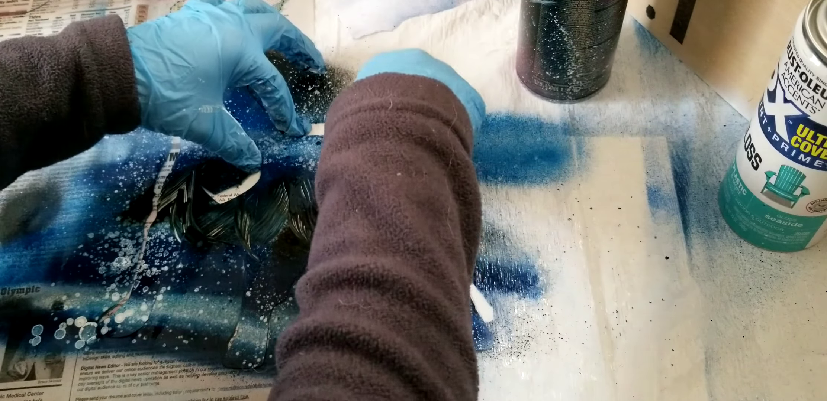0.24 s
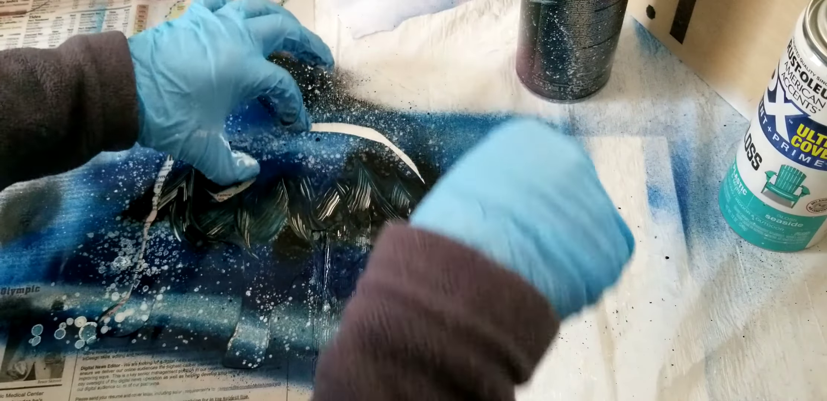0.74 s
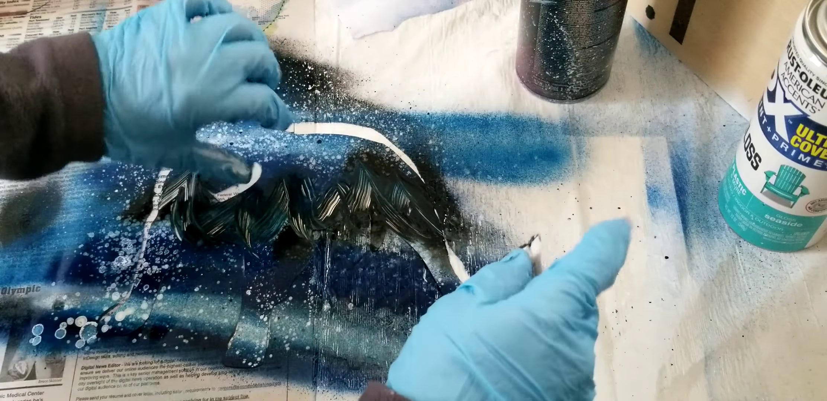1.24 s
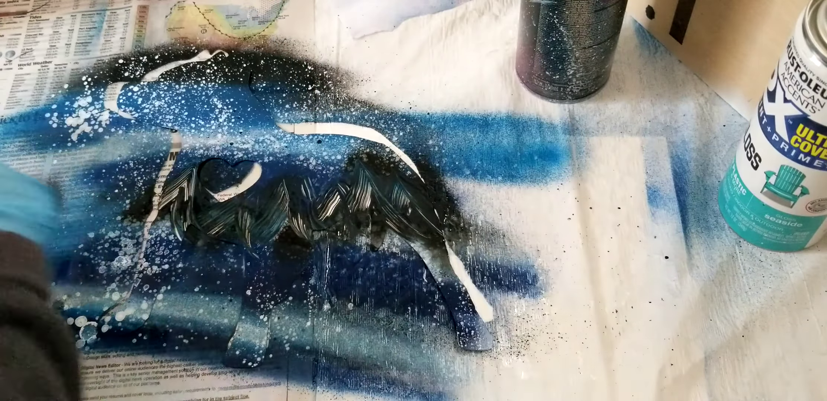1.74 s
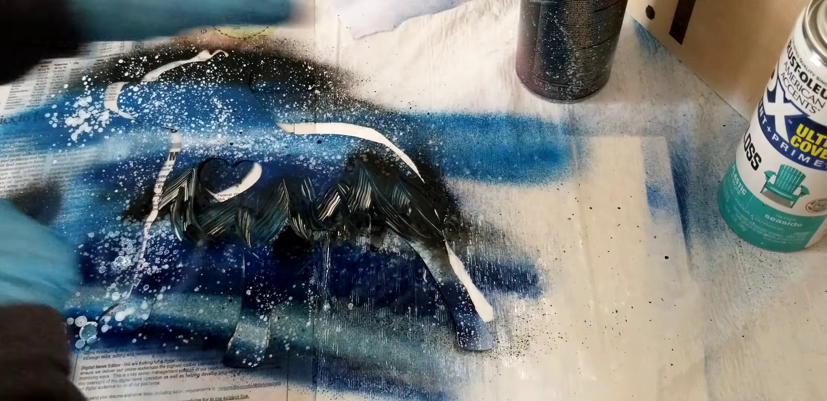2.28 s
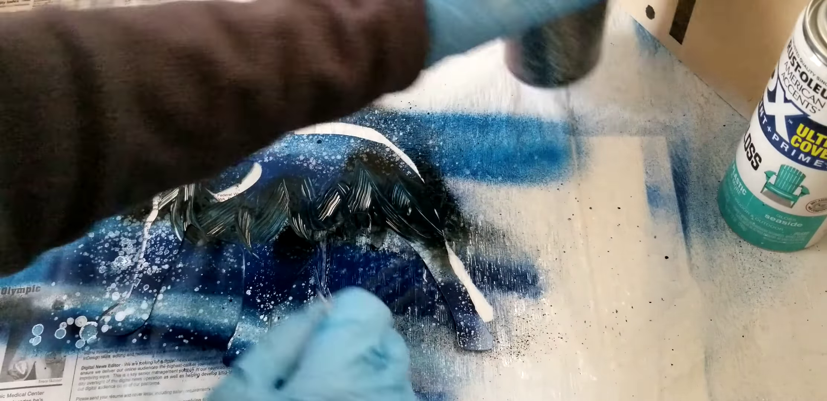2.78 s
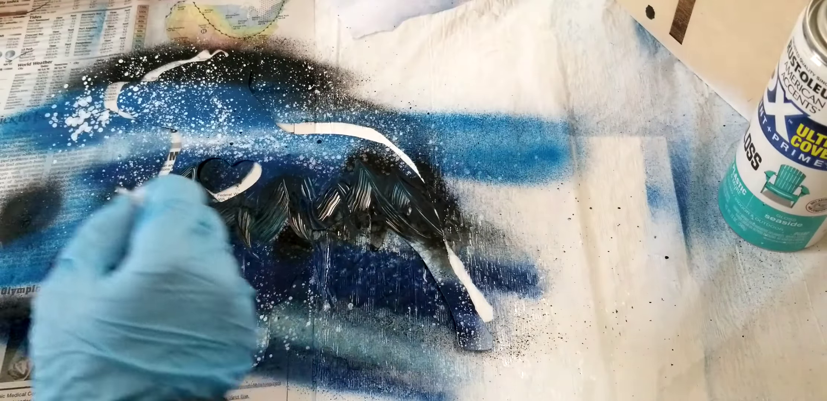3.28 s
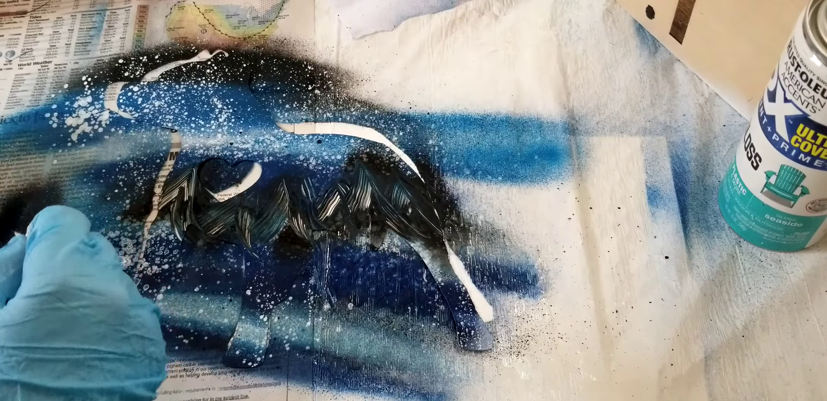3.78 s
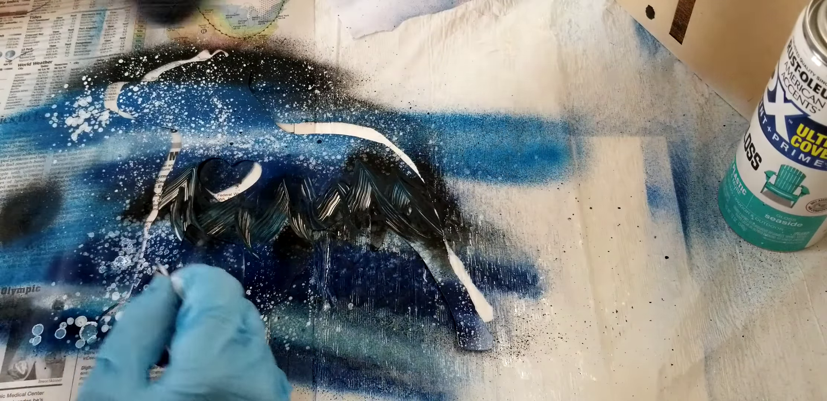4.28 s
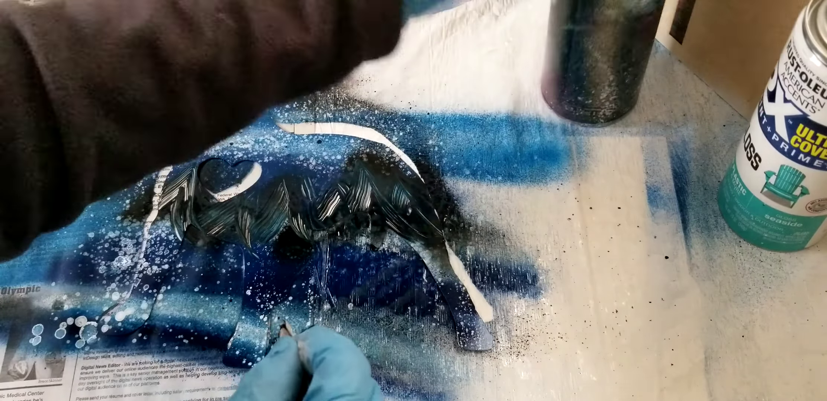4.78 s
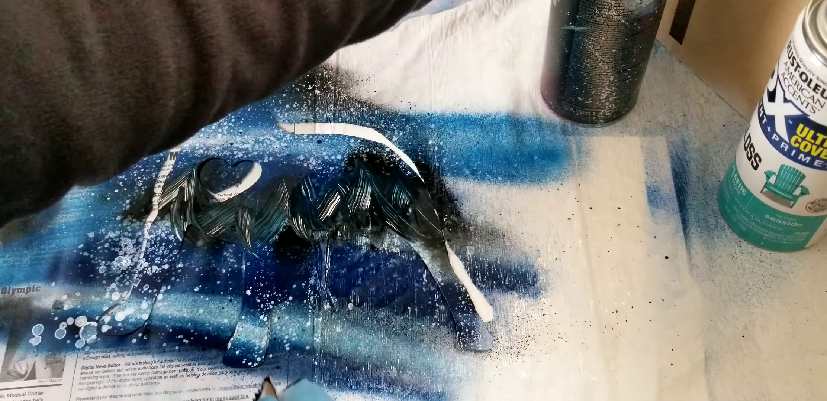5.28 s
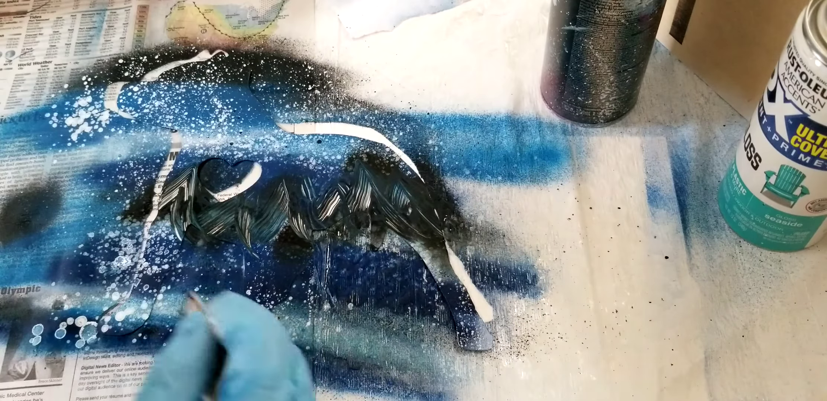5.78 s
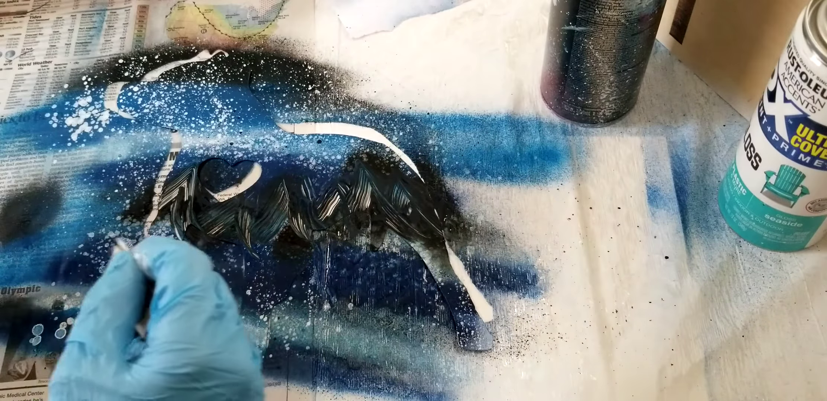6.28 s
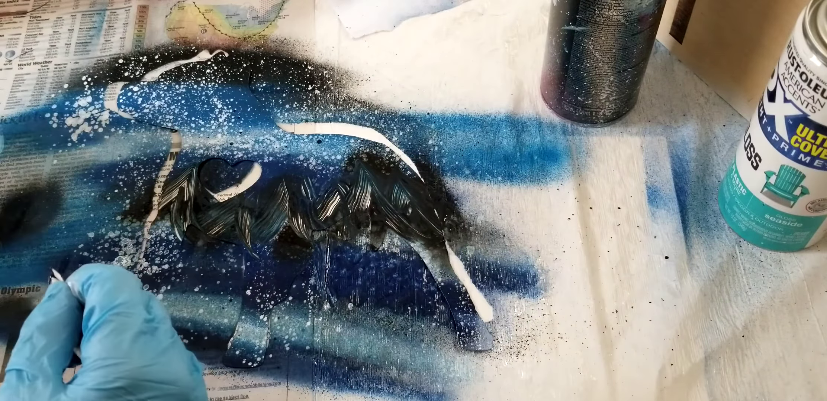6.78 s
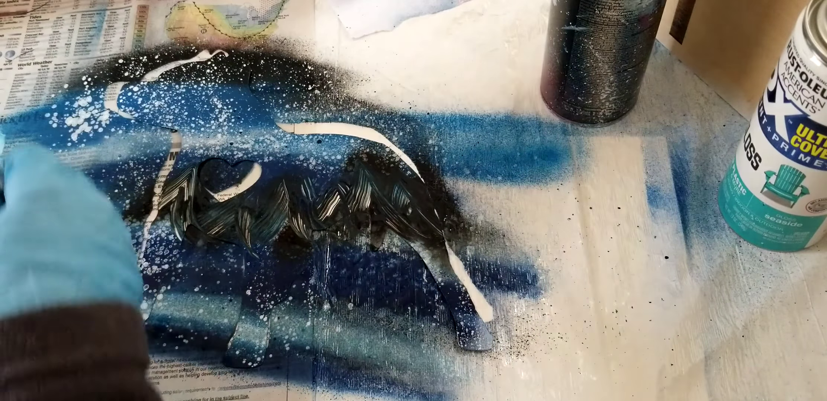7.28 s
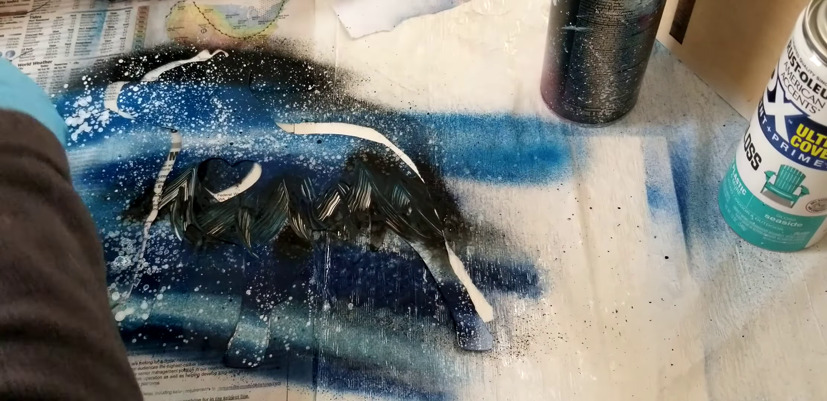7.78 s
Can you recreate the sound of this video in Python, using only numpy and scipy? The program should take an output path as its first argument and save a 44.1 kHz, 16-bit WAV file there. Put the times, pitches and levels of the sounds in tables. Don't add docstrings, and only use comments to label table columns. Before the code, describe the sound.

A small, fairly dry room with a faint mains motor hum and soft hiss; a close stereo pair hears the work mostly left. Light paper rustles and tiny flecks begin, with crackles at 0.7-0.8 s and sharp ticks at 1.0 and 1.2. Soft low bumps come at 2.0-2.1, a crisp tick at 2.7. From 3.1 to 3.45 stiff paper snaps and crumples loudly, with a brief rubbery squeak at 3.1-3.2. Two hissing rips follow at 3.5 and 3.75, then small snaps around 4. At 4.58 a can lands hard: bright crack, deep table boom, then little rocking bumps until 5.05. Crackles at 5.4 and 5.9 sit among faint rustles and barely audible whistles. Two more quick rips come at 6.7 and 6.9, then snapping, rustling and a thin whistle around 7.1-7.25. A heavy, dull double knock at 7.72-7.76 ends in light paper ticks.

```python
import sys
import numpy as np
from scipy import signal
from scipy.fft import rfft, irfft, next_fast_len
from scipy.io import wavfile
from scipy.ndimage import uniform_filter1d

SR = 44100
rng = np.random.default_rng(int(sys.argv[2]) if len(sys.argv) > 2 else 0)


def voltage_ratio(level):
    return 10 ** (np.asarray(level, float) / 20)


def waveform_to_disk(signal):
    frames = np.transpose(np.atleast_2d(signal))
    scaled = np.clip(frames, -1, 1) * 32767
    samples = np.round(scaled).astype(np.int16)
    wavfile.write(sys.argv[1], SR, samples)


N = 354563
TIME = np.arange(N) / SR
STEP = 32
LEFT_LEAD = 11
TOP_HZ = 15800
ALIKE_BASS = .95


def in_time(rows):
    s, *columns = np.transpose(rows)
    return [np.interp(TIME, s, c) for c in columns]


def rms_one(x):
    return x / np.sqrt(np.mean(x ** 2) + 1e-20)


def drift(rate):
    r = np.exp(-2 * np.pi * rate * 20 / SR)
    steps = rng.standard_normal(N // 20 + 3002)
    slow = signal.lfilter([1], [1, -2 * r, r * r], steps)[3000:]
    return np.interp(np.arange(N) / 20, np.arange(len(slow)), rms_one(slow - slow.mean()))


def noise(spectrum, alike, lead=LEFT_LEAD):
    size = next_fast_len(N + 64)
    hz = np.maximum(np.arange(size // 2 + 1) * SR / size, 1)
    points = np.array(spectrum)
    shared, left, right = rng.standard_normal((3, size))
    alike = np.clip(alike, 0, 1)
    common = np.sqrt(alike) * np.array([shared, np.roll(shared, lead)])
    own = np.sqrt(1 - alike) * np.array([left, right])
    colour = voltage_ratio(np.interp(np.log(hz), np.log(points[:, 0]), points[:, 1])) * (hz < TOP_HZ)
    return rms_one(irfft(rfft(common + own) * colour, size)[:, :N])


def sides(pan_db):
    return np.array([voltage_ratio(pan_db / 2), voltage_ratio(-pan_db / 2)])


def placed(x, pan_db):
    return np.array([x, np.roll(x, LEFT_LEAD)]) * sides(pan_db)[:, None]


def ring(clicks, hz, t60):
    r, w = voltage_ratio(-60 / (t60 * SR)), 2 * np.pi * hz / SR
    return signal.lfilter([0, np.sin(w)], [1, -2 * r * np.cos(w), r * r], clicks + 1e-18)


def fade(clicks, t60):
    return signal.lfilter([1], [1, -voltage_ratio(-60 / (t60 * SR))], clicks + 1e-18)


def grain(per_s, spread_db, t60, smooth):
    sizes = voltage_ratio(spread_db * np.minimum(rng.exponential(1, N), 4))
    born = rng.random(N) < per_s / SR
    return rms_one(smooth + rms_one(fade(sizes * born, t60)))


def no_bass(x, hz):
    return signal.sosfilt(signal.butter(4, hz, "high", fs=SR, output="sos"), x)


def dull(x, hz):
    return signal.sosfilt(signal.butter(2, min(hz, 18000), fs=SR, output="sos"), x)


def swell_power(s, db, held_s, rise, fall):
    t = TIME[::STEP]
    below_db = rise * np.maximum(s - t, 0) + fall * np.maximum(t - s - abs(held_s), 0)
    return voltage_ratio(2 * (db - np.minimum(below_db, 150)))


# time_s, hum_db
BACKGROUND_GAIN = [(0.0, -56.5), (2.53, -50), (3.09, -56.5), (4.45, -62), (4.6, -63.5), (8.04, -54.5)]
# pitch_hz, level_db
MOTOR_LINES = [(59.5, -3), (119.5, -12), (238.5, -27), (358.5, -18.5), (477, -25)]
# frequency_hz, density_db_per_hz
RUMBLE = [(12, -37.5), (20, -49), (39, -9), (59, 9), (86, -9.5), (124, -14.5), (323, -22.5), (360, -22.5),
          (409, -21), (472, -24.5), (1500, -52), (1950, -75.5), (3300, -120)]
# frequency_hz, density_db_per_hz
HISS = [(410, -30), (700, -20.5), (920, -8.5), (1010, -13.5), (4560, -21), (5540, -9.5), (8630, -24.5),
        (12700, -8.5), (15700, -5.5)]


def background():
    hum_db, = in_time(BACKGROUND_GAIN)
    lines = 0
    for hz, db in MOTOR_LINES:
        lines = lines + voltage_ratio(db + 2.5 * drift(1.4)) * np.sin(2 * np.pi * hz * TIME + 1.1 * drift(3.3))
    rumble = voltage_ratio(-6.5) * noise(RUMBLE, alike=ALIKE_BASS, lead=0) * voltage_ratio(0.5 * drift(6.2))
    hiss = voltage_ratio(-14.0) * noise(HISS, alike=0.079)
    return voltage_ratio(hum_db) * (voltage_ratio(-2.0) * lines * sides(3.0)[:, None] + rumble + hiss)


# frequency_hz, density_db_per_hz
PAPER = [(1180, -14), (2000, -12), (2140, -6.5), (2280, -10.5), (2730, -5), (3380, -7), (4350, -3),
         (4860, -4), (7040, 0.5), (8080, -11.5), (10700, -4.5), (15700, 1)]
# start_s, level_db, held_s
STROKES = [(.3, -69, 0.097), (.55, -73, 3.75), (.6, -62.5, 0.019), (.73, -61, 0.018),
           (0.799, -44.5, 0.0058), (1.0, -53.5, 0.054), (1.3, -61, 0.07), (1.54, -59.5, 0.0045),
           (2.12, -68.5, 0.28), (2.53, -63.5, 0.094), (2.74, -53.5, 0.013), (2.911, -49.5, 0.0067),
           (3.04, -51, 0.4), (3.298, -37, 0.092), (3.99, -58, 0.015), (4.14, -59, .02),
           (4.659, -59.5, 0.043), (4.75, -72, 2.5), (5.41, -51.5, 0.0039), (5.74, -63.5, 0.021),
           (5.971, -56, 0.0054), (6.12, -59, 0.077), (6.25, -57, 0.049), (7.101, -46.5, 0.15),
           (7.45, -63.5, 0.022), (7.7, -64.5, 0.25)]
# start_s, level_db, held_s, pitch_hz
POCKETS = [(.78, -56.5, 0.052, 2590), (2.28, -61.5, 0.006, 2500), (2.38, -59, 0.094, 1870),
           (2.56, -64.5, 0.19, 2200), (2.92, -61.5, 0.0069, 950), (3.1, -57, 0.072, 2700),
           (3.245, -46, 0.028, 2060), (3.288, -34.5, 0.026, 2700), (3.4, -50, 0.075, 1530),
           (3.525, -55.5, 0.016, 2500), (3.745, -52, .012, 2530), (3.825, -57, .012, 2700),
           (4.098, -82, 0.088, 2910), (5.15, -71, 0.0038, 2830), (5.375, -50.5, 0.015, 1620),
           (5.43, -48, 0.005, 3380), (5.8, -69.5, 0.16, 2570), (5.96, -60.5, 0.026, 2050),
           (6.08, -72.5, 0.099, 3000), (6.17, -60.5, 0.021, 1750), (6.288, -62.5, 0.14, 1680),
           (6.62, -67.5, 0.026, 2520), (6.7, -54, 0.097, 2700), (7.1, -51.5, 0.045, 1670),
           (7.221, -52.5, 0.055, 2700), (7.86, -68.5, 0.11, 1050)]
STROKE_RISE_DB_PER_S, STROKE_FALL_DB_PER_S, STILL_DB = 194, 170, -80
POCKET_RISE_DB_PER_S, POCKET_FALL_DB_PER_S, FLAT_DB = 519.5, 290.5, -90.5


def rustle():
    bright = noise(PAPER, alike=0.26)
    white = noise([(20, 0.0068), (20000, 0.032)], alike=0.39)
    stroking = voltage_ratio(2 * STILL_DB)
    for row in STROKES:
        stroking = stroking + swell_power(*row, STROKE_RISE_DB_PER_S, STROKE_FALL_DB_PER_S)
    pockets = np.array([swell_power(*row[:3], POCKET_RISE_DB_PER_S, POCKET_FALL_DB_PER_S) for row in POCKETS])
    hollow_hz = np.array(POCKETS)[pockets.argmax(axis=0), 3]
    hollow_hz = uniform_filter1d(hollow_hz, size=SR // 25 // STEP)

    def smooth(control):
        return np.interp(TIME, TIME[::STEP], control)

    hollow, power = 0, 1e-9
    for k, hz in enumerate(np.geomspace(800, 3600, num=9)):
        octaves_off = np.log2(hollow_hz / hz)
        gain = voltage_ratio(np.maximum(-125 * octaves_off ** 2, -19) + 4.2 * drift(12.0)[::STEP])
        hollow = hollow + (-1) ** k * smooth(gain) * rms_one(ring(white, hz, 25.0 / hz))
        power = power + gain ** 2
    grains = grain(per_s=140, spread_db=3.5, t60=0.015, smooth=2.2) * voltage_ratio(1.5 * drift(30))
    pocket_level = np.sqrt((voltage_ratio(2 * FLAT_DB) + pockets.sum(axis=0)) / power)
    mix = smooth(np.sqrt(stroking)) * bright + smooth(pocket_level) * hollow
    return no_bass(sides(5.0 + 4.6 * drift(1.8)) * mix * grains, hz=950.0)


# time_s, pan_db
HAND = [(0.6, 5.5), (.97, 5.5), (1.21, 14.5), (2.4, 14), (2.73, -3), (2.92, 0.5), (3.12, 4.5), (3.3, 9.5),
        (4.0, 6.5), (4.58, -1), (5.29, 14.5), (5.37, -0.5), (5.94, 8.5), (7.1, 1), (7.43, 8), (7.9, 3)]
# start_s, peak_db
FLECKS = [(0.2687, -59), (0.382, -46), (0.4932, -50), (0.6638, -54), (0.6886, -49), (0.7063, -34),
          (0.74, -36), (0.782, -39), (0.805, -23), (0.8469, -37), (0.997, -28), (3.1856, -16.5),
          (3.2441, -24), (3.297, -15), (3.312, -31), (3.335, -31), (3.4116, -33), (3.443, -27),
          (3.468, -34), (4.5727, -8.5), (4.5902, -14), (4.6004, -16), (4.6215, -30), (4.717, -54),
          (4.761, -42.5), (4.7914, -34.5), (4.8383, -50), (4.849, -58), (4.902, -46), (4.9265, -50),
          (4.95, -52), (5.0107, -48), (5.0436, -35.5), (5.105, -52), (5.1476, -60), (5.1597, -46),
          (5.255, -55), (5.2797, -53), (5.2923, -32), (5.356, -34), (5.424, -23.5), (5.5586, -61),
          (5.7187, -51.5), (5.839, -44.5), (5.9233, -53), (5.9409, -25.5), (6.114, -57), (6.1604, -39),
          (6.238, -52), (6.258, -44), (6.4096, -62), (7.0648, -42), (7.0768, -44), (7.1573, -22.5),
          (7.172, -34), (7.182, -37), (7.2405, -36), (7.289, -34), (7.3795, -45), (7.4275, -43)]
FLECK_T60_S, FLECK_TAIL_T60_S, FLECK_TAIL_DB = .008, .04, -11.5


def flecks():
    s, peak_db = np.transpose(FLECKS)
    clicks = np.zeros((2, N))
    clicks[:, (s * SR).astype(int)] = voltage_ratio(peak_db - 6.5) * sides(np.interp(s, *np.transpose(HAND)))
    tail = voltage_ratio(FLECK_TAIL_DB) * fade(clicks, FLECK_TAIL_T60_S)
    shape = fade(clicks, FLECK_T60_S) + tail - fade(clicks, 0.0018)
    return no_bass(noise(PAPER, alike=0.71) * shape, hz=3600.0)


# start_s, peak_db, fold_pitch_hz, fold_ring_db
CRUMPLES = [(0.5851, -46.5, 5230, -8), (0.8016, -29, 4400, -39), (0.9687, -40, 4800, -19),
            (0.9953, -43, 4000, -6), (2.0168, -48, 4880, -4), (2.3627, -55, 1900, 2),
            (2.6902, -37.5, 2950, -10), (3.1827, -28, 1370, -1), (3.2933, -15, 2660, -15),
            (4.573, -18.5, 1610, -0.5), (4.5895, -21, 1050, -5), (4.6706, -41, 4000, 5),
            (5.366, -28, 1550, -12.5), (5.4182, -23.5, 3380, -8.5), (7.1572, -28, 2970, -1.5),
            (7.222, -27.5, 2706, -15.5), (7.7243, -34.5, 1187, 12)]
# start_s, peak_db, fold_pitch_hz, fold_ring_db
SNAPS = [(1.3575, -43.5, 3830, -26), (1.9185, -45, 4730, 0), (2.1026, -43, 3800, -3),
         (2.7215, -19.5, 1710, -7), (2.9139, -42, 3830, -22), (3.117, -13, 2700, -8.5),
         (3.1487, -17, 2900, -9), (3.2681, -10, 4410, -2), (3.3465, -17, 2700, -13),
         (3.8846, -29.5, 3870, 4.5), (3.9916, -38, 4750, 7), (4.011, -30.5, 3650, -4),
         (4.8718, -38.5, 4060, 0.5), (5.0345, -45, 6300, 5.5), (5.2925, -44, 5300, -1),
         (6.9125, -42, 4350, 0), (7.095, -16.5, 4570, -7), (7.434, -48, 3680, 5.5),
         (7.7634, -23, 2680, -2.5), (7.9351, -57.5, 1050, 11), (7.9555, -31.5, 3820, -12)]
# start_s, peak_db, fold_pitch_hz, fold_ring_db
TICKS = [(0.6804, -47, 4320, -16), (1.0395, -15, 1620, -12), (1.2078, -19.5, 2900, -28),
         (2.516, -47, 1800, 4), (2.6405, -34, 1250, -14), (2.7304, -10.5, 1800, -11.5),
         (2.7459, -28, 4400, -5), (3.3068, -33, 4340, 8), (3.3897, -26, 2350, -2.5),
         (3.9598, -21.5, 4150, 2), (4.0254, -38, 3600, 5), (4.119, -31.5, 5260, -19),
         (4.1482, -37, 5040, -18), (4.1614, -38, 3250, -18), (4.1711, -39.5, 2800, -7),
         (4.226, -43, 5300, -2), (4.802, -47, 1140, 17), (5.1726, -47, 3930, -7), (5.3904, -16.5, 1784, -3),
         (5.401, -16.5, 1630, -2), (6.0167, -45, 3020, 3), (6.1778, -34.5, 1630, -7),
         (6.6848, -30.5, 5000, -27), (7.1998, -28, 2250, -23)]
TICK_T60_S, SNAP_T60_S, CRUMPLE_T60_S = 0.078, 0.11, 0.13
TICK_TAIL_DB, SNAP_TAIL_DB, CRUMPLE_TAIL_DB = -18, -11, -5
TAIL_DULL_HZ = 9500


def snaps():
    crackle = grain(per_s=690, spread_db=2.5, t60=0.01, smooth=0.99)
    bright = no_bass(noise(PAPER, alike=0.35, lead=0) * crackle, hz=1630.0)
    bright = np.array([bright, dull(bright, hz=TAIL_DULL_HZ)])
    bright = np.pad(bright, ((0, 0), (0, 0), (0, SR // 4)), mode="wrap")
    out, t = np.zeros((2, N + SR)), np.arange(SR // 4) / SR
    kinds = [(CRUMPLES, CRUMPLE_T60_S, CRUMPLE_TAIL_DB),
             (SNAPS, SNAP_T60_S, SNAP_TAIL_DB),
             (TICKS, TICK_T60_S, TICK_TAIL_DB)]
    rows = [(*row, t60, tail_db) for table, t60, tail_db in kinds for row in table]
    whites = rng.standard_normal((len(rows), len(t)))
    for (s, peak_db, hz, fold_db, t60, tail_db), white in zip(rows, whites):
        pan_db = np.interp(s, *np.transpose(HAND))
        i = round(s * SR)
        span = slice(i, i + len(t))
        rise = 1 - np.exp(-t / (0.0073 * t60))
        crack = voltage_ratio(-2.5 - 60 * t / 0.002) * (tail_db < -6) + rise * voltage_ratio(-60 * t / 0.014)
        tail = rise * voltage_ratio(tail_db - 60 * t / t60)
        fold = ring(ring(white, hz, 18.0 / hz), hz, 2.0 / hz)
        higher = 1.75 + 0.29 * white[0]
        second = ring(white[::-1], hz * higher, 67.0 / hz)
        fold = rms_one(rms_one(fold) + .5 * rms_one(second))
        both = voltage_ratio(peak_db - 4.5) * (crack * bright[0, :, span] + tail * bright[1, :, span])
        fold_shape = crack + tail * voltage_ratio(-25.0 * t / t60)
        both = both + voltage_ratio(peak_db - 6.0 + fold_db) * fold_shape * fold
        both = both * sides(pan_db)[:, None]
        late = int(np.clip(2.6 * pan_db, -8, 17))
        out[0, span] += both[0]
        out[1, i + late:i + late + len(t)] += both[1]
    return no_bass(out[:, :N], hz=1050.0)


# start_s, peak_db, upper_modes_db, boom_hz, boom_t60_s
BUMPS = [(1.04, -46.5, -28, 600, 0.026), (1.209, -48, -24, 190, 0.11), (2.017, -29, -27, 110, 0.21),
         (2.041, -28.5, -36, 136, 0.13), (2.103, -42.5, -12.5, 108, 0.16), (2.12, -43.5, -27.5, 240, 0.37),
         (2.665, -46, -10, 75.4, 0.82), (2.727, -42, -11, 140, 0.098), (2.733, -29, -10, 124, 0.17),
         (2.795, -38.5, -17, 202, 0.11), (3.269, -46, -24.5, 520, .07), (3.295, -44, -24.5, 433, 0.056),
         (3.346, -46.5, -25.5, 560, 0.053), (3.39, -50, -33, 467, 0.049), (3.44, -58, -24.5, 537, 0.059),
         (4.573, -20.5, -4.5, 153.5, 0.19), (4.58, -5.5, -21.5, 116.5, 0.067),
         (4.594, -19.5, -16.5, 152, 0.15), (4.664, -36, -8.5, 76.7, 0.38), (4.749, -43, -15, 228, 0.083),
         (4.774, -34.5, -7, 73, 0.28), (4.788, -45, -9, 129, 0.06), (4.802, -39, -7, 96, 0.14),
         (4.837, -36, -13.5, 160, 0.089), (4.852, -39, -19, 181, 0.05), (4.868, -40.5, -33, 90, 0.07),
         (4.889, -31.5, -19, 121, 0.1), (4.899, -30.5, -21, 69.6, 0.12), (4.918, -36.5, -12.5, 74.5, 0.21),
         (4.9682, -43.5, -0.5, 139, 0.17), (5.0429, -45.5, -4, 77, 0.31), (5.0541, -50.5, 1, 111, 0.069),
         (5.392, -40.5, -4.5, 146, 0.15), (5.734, -52.5, -13, 75.4, 0.14), (7.7236, -9.5, -40, 113.5, 0.32),
         (7.7256, -23, -3, 464, 0.054), (7.735, -25, -1.5, 540, 0.056), (7.7649, -16, -21, 115.6, 0.19),
         (7.829, -26.5, -26, 126, 0.16)]
# pitch_hz, level_db, t60_s
TABLE_MODES = [(188, 0.5, 0.1), (231.8, -10, 1), (257, 4.5, 0.076), (396.5, -2, 0.13), (446, -1.5, 0.042),
               (744, -4.5, 0.046), (843, -17.5, 0.4), (1187, -11.5, 0.079), (2680, -34.5, 0.48)]
# frequency_hz, density_db_per_hz
THUD = [(120, -23), (250, 5), (500, -13.5), (1200, -16.5), (2500, -22.5), (6000, -42.5)]
# from_s, to_s
HANDS_OFF = [
    (2.09, 2.2),
    (4.76, 5.1),
]
SOFT_BELOW_DB, SOFT_HZ = -25, 1320


def bumps():
    boom, shake = np.zeros(N + SR), np.zeros((2, N))
    strikes = np.zeros((len(TABLE_MODES), N))
    spreads = rng.normal(0, 3, (len(BUMPS), len(TABLE_MODES)))
    t = np.arange(SR // 2) / SR
    lasting = np.array(TABLE_MODES)[:, 2] > .19
    for (s, peak_db, upper_db, hz, t60), spread_db in zip(BUMPS, spreads):
        i = round(s * SR)
        boom[i:i + len(t)] -= voltage_ratio(peak_db - 7.5 - 60 * t / max(t60, .02)) * np.sin(2 * np.pi * hz * t)
        held = all(not a < s < b for a, b in HANDS_OFF)
        held_db = -18 * lasting * held
        strikes[:, i] -= voltage_ratio(peak_db + upper_db - 5.5 + spread_db + held_db)
        shake[int(peak_db < SOFT_BELOW_DB), i] += voltage_ratio(peak_db + upper_db + 2.0)
    knock = sum(voltage_ratio(db) * ring(hit, hz, t60) for hit, (hz, db, t60) in zip(strikes, TABLE_MODES))
    knock = dull(knock, hz=2200.0)
    dense = noise(THUD, alike=ALIKE_BASS, lead=0)
    hard = dense * fade(shake[0], .085)
    soft = dense * fade(shake[1], .06)
    thud = hard + voltage_ratio(-4.5) * dull(dull(soft, hz=SOFT_HZ), hz=SOFT_HZ)
    high_pass = signal.butter(2, 55.0, "high", fs=SR, output="sos")
    return signal.sosfilt(high_pass, boom[:N] + knock + thud) * sides(5.0)[:, None]


# time_s, slips_per_s, level_db
SQUEAK = [(3.11, 243, -62), (3.12, 226, -30.5), (3.165, 225, -30.5), (3.192, 228, -35), (3.205, 222, -45.5),
          (3.23, 230, -47.5), (3.265, 270, -61.5), (3.3, 410, -100)]
# pitch_hz, width_hz, level_db
GLOVE = [(890, 490, 0), (1100, 110, -6.5), (1350, 180, 1.5), (2250, 110, 0), (2700, 110, -3.5)]


def squeak():
    per_s, level_db = in_time(SQUEAK)
    slip_count = np.floor(np.cumsum(per_s * (1 + 0.029 * drift(60))) / SR)
    slips = np.diff(slip_count, prepend=0) * voltage_ratio(0.78 * rng.standard_normal(N))
    slips = np.diff(slips, prepend=0)
    rings = 0
    for k, (hz, width, db) in enumerate(GLOVE):
        rings = rings + voltage_ratio(db) * (-1) ** k * ring(slips, hz, np.log(1000) / np.pi / width)
    sounding = (TIME > SQUEAK[0][0]) * (TIME < SQUEAK[-1][0])
    return placed(rms_one(no_bass(rings, hz=800.0)) * voltage_ratio(level_db) * sounding, 4.6)


# start_s, end_s, start_db, midway_db, end_db
PULLS = [
    (3.519, 3.679, -29, -30.5, -32),
    (3.736, 3.85, -29, -33.5, -26.5),
    (6.682, 6.82, -30.5, -25, -34),
    (6.905, 7.025, -29.5, -28.5, -36),
]
# frequency_hz, density_db_per_hz
TEAR = [(150, -35), (250, -36), (406, -30), (564, -35), (933, -38), (1280, -32), (1720, -35.5),
        (2100, -24.5), (2680, -17.5), (3190, -23), (6960, -10.5), (8710, -19.5), (12500, -3.5), (15700, -4)]
PULL_PAN_DB = 5.5


def pulls():
    threads = grain(per_s=340, spread_db=12.0, t60=0.011, smooth=38.0)
    hiss = noise(TEAR, alike=0.28) * threads * voltage_ratio(2.0 * drift(16))
    level = 0
    for start, end, start_db, mid_db, end_db in PULLS:
        corners = [start - .004, start + 0.0089, (start + end) / 2, end, end + 0.067]
        levels = [start_db - 17.5, start_db, mid_db, end_db, end_db - 40.0]
        level = level + voltage_ratio(np.interp(TIME, corners, levels, left=-150, right=-150))
    return level * sides(PULL_PAN_DB)[:, None] * hiss


# start_s, length_s, first_hz, last_hz, top_db
WHISTLES = [
    (5.745, 0.31, 1007, 1385, -77.5),
    (5.837, 0.18, 2030, 2180, -62),
    (6.533, 0.1, 2054, 2170, -59.5),
    (7.175, 0.082, 2283, 2250, -44),
    (7.242, 0.12, 1095, 1350, -65),
]
WHISTLE_TOP_SHARE, WHISTLE_EDGE_DB = 0.36, -82.5


def whistles():
    out = 0
    waver = 1 + .007 * drift(60)
    flicker = 1.93 * (1 + 0.56 * drift(130))
    for s, length, first_hz, last_hz, top_db in WHISTLES:
        hz = np.interp(TIME, [s, s + length], [first_hz, last_hz])
        corners = [s, s + WHISTLE_TOP_SHARE * length, s + length]
        levels = [WHISTLE_EDGE_DB, top_db, WHISTLE_EDGE_DB]
        level_db = np.interp(TIME, corners, levels, left=-150, right=-150)
        out = out + voltage_ratio(level_db) * np.sin(2 * np.pi * np.cumsum(hz * waver) / SR)
    return placed(out * flicker, 5.0)


ROOM_T60_S, WALL_CUT_HZ = 0.26, 3670


def room(x):
    size = next_fast_len(N + SR)
    turn = np.exp(-2j * np.pi * np.arange(size // 2 + 1) / size)
    keep = np.exp(-2 * np.pi * WALL_CUT_HZ / SR)
    wall = (1 - keep) / (1 - keep * turn)
    answer = np.zeros((2, len(turn)), complex)
    lags = (rng.uniform(0.0054, .03, 16) * SR).astype(int)
    for k, lag in enumerate(lags):
        once = voltage_ratio(-60 * lag / SR / ROOM_T60_S) * wall * np.exp(1j * np.angle(turn) * lag)
        answer[k % 2] += (-1) ** (k // 2) * once / (1 - once)
    return irfft(rfft(x, size) * answer, size)[:, :N]


def scene():
    crisp = flecks() + snaps() + squeak() + pulls() + whistles()
    table = bumps()
    wet = room(voltage_ratio(-8.5) * crisp.mean(axis=0) + voltage_ratio(-11.0) * no_bass(table.mean(axis=0), hz=423.0))
    return background() + rustle() + crisp + table + wet


def band_limit(x):
    return signal.sosfilt(signal.butter(12, 16990, fs=SR, output="sos"), x)


def record(dry):
    top_cut = signal.cheby2(10, 60, 17300, fs=SR, output="sos")
    return band_limit(signal.sosfilt(top_cut, dry))


dry = scene()
out = record(dry)
waveform_to_disk(out)
```